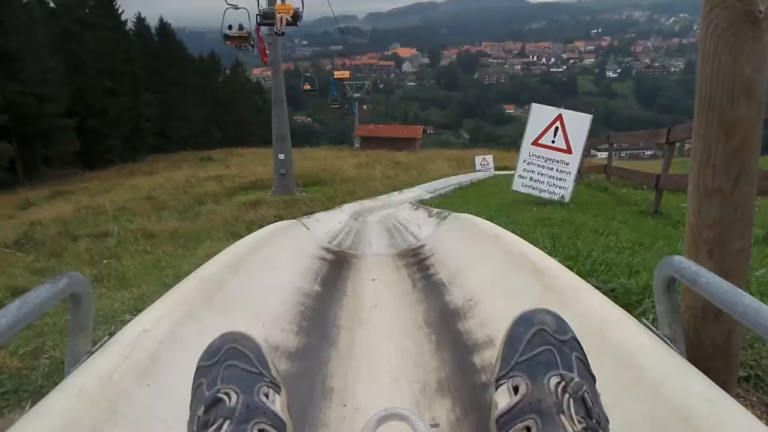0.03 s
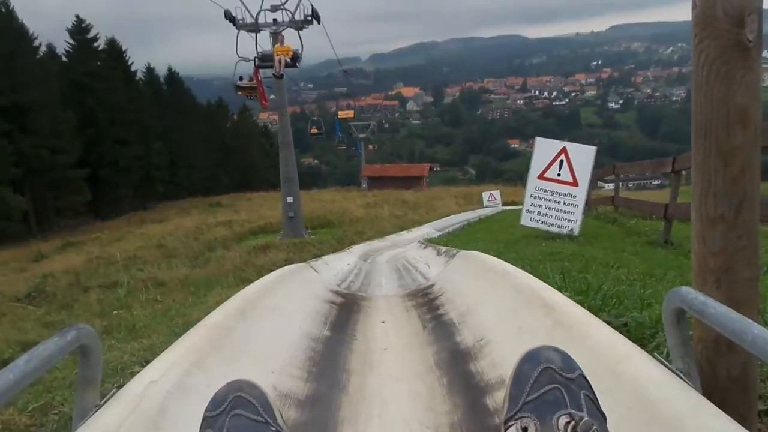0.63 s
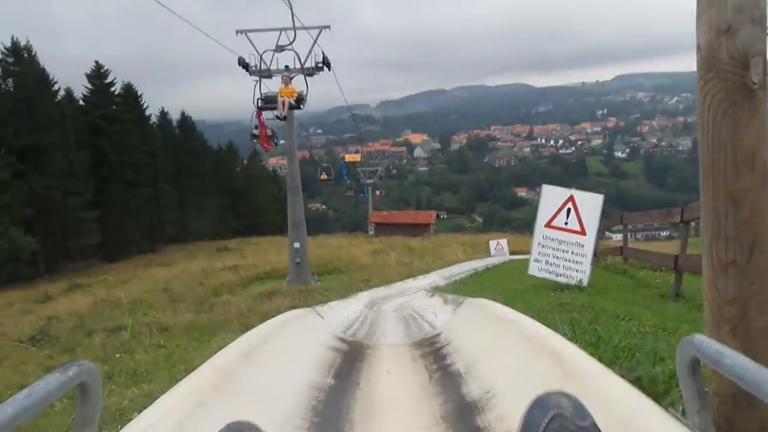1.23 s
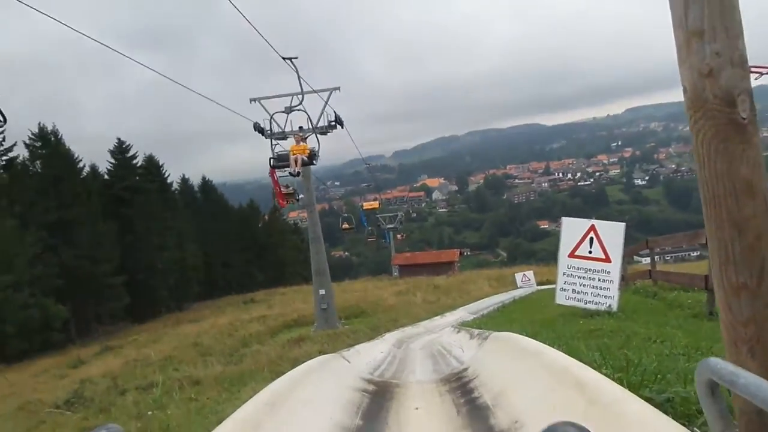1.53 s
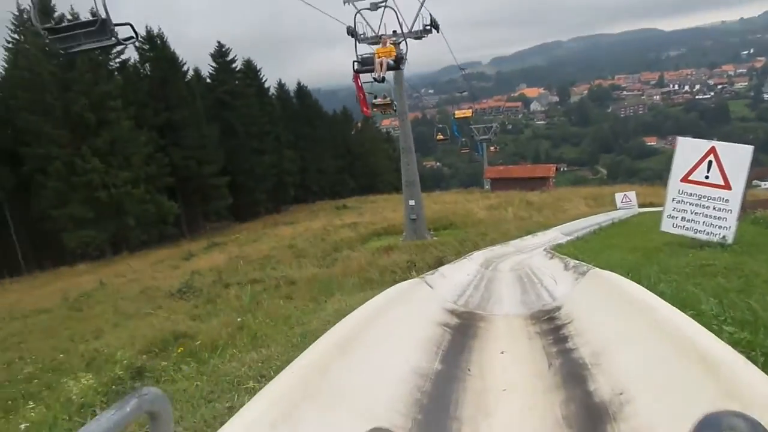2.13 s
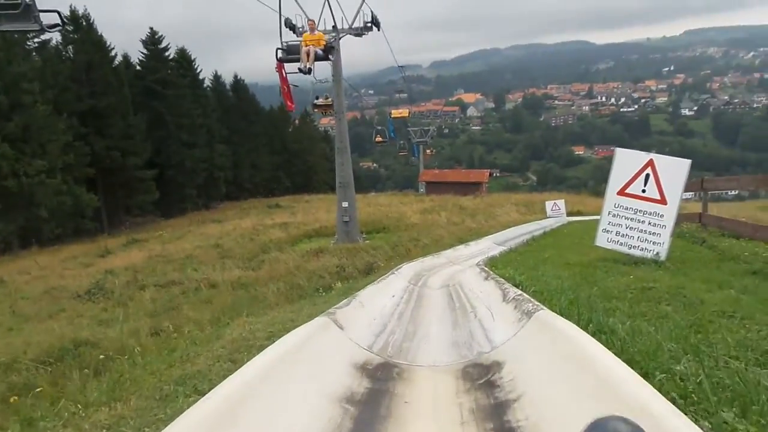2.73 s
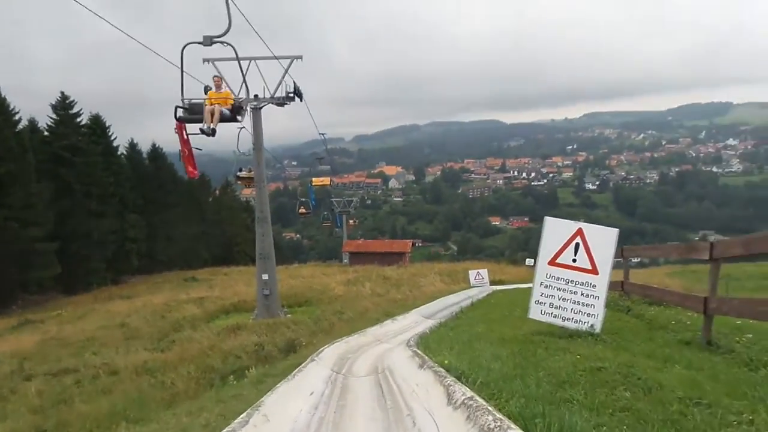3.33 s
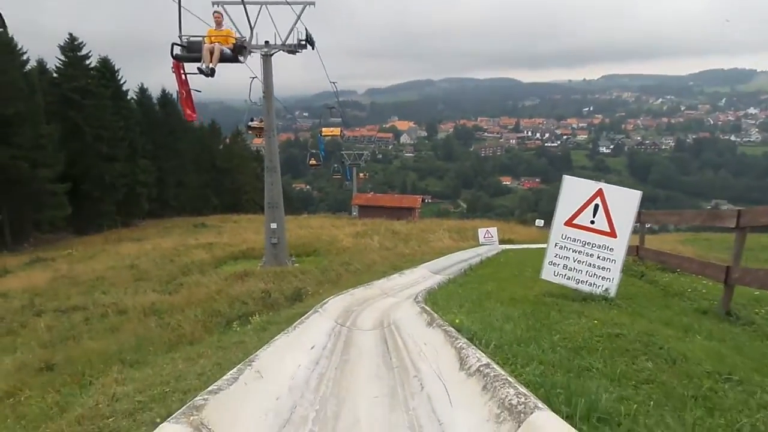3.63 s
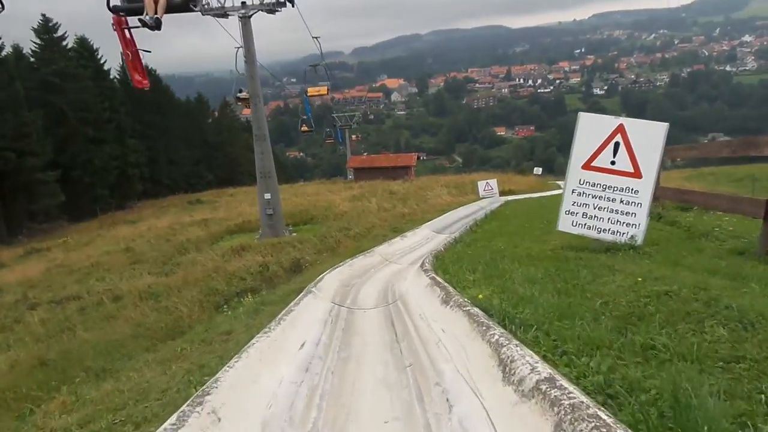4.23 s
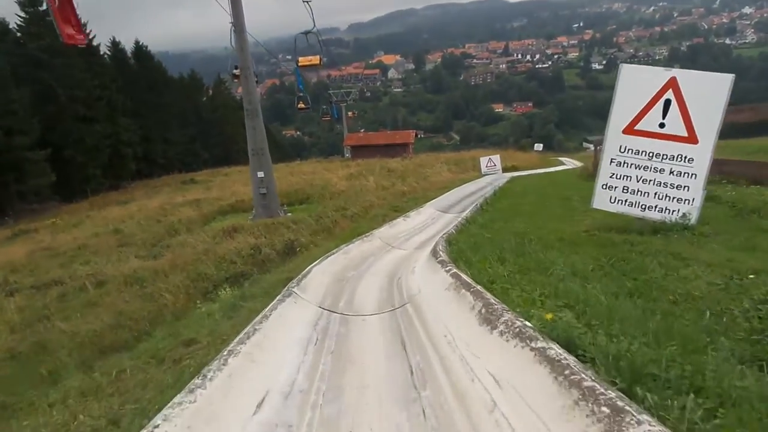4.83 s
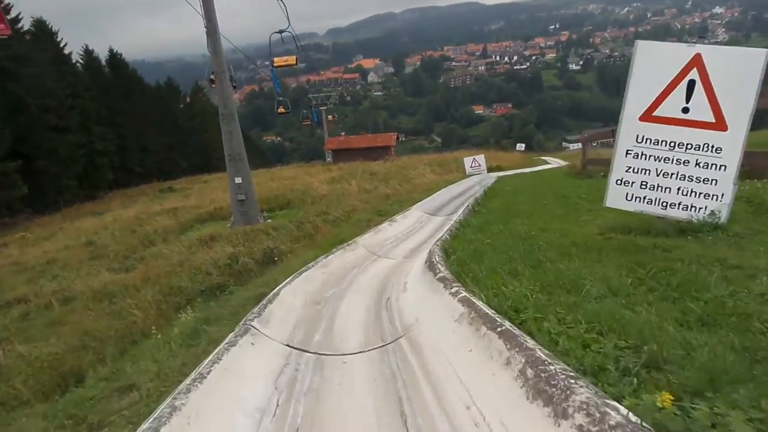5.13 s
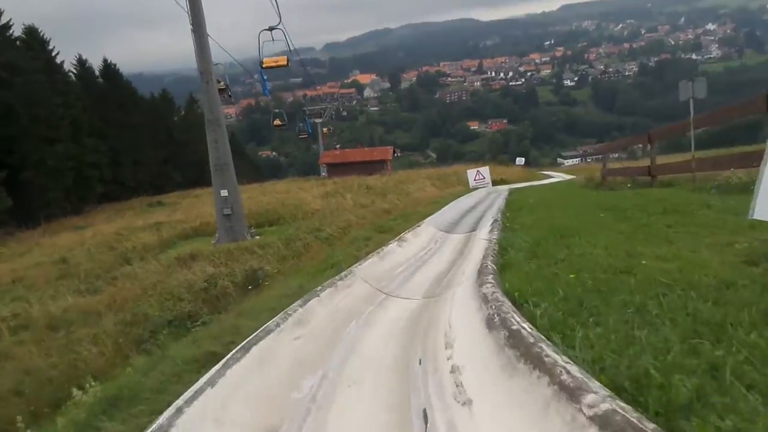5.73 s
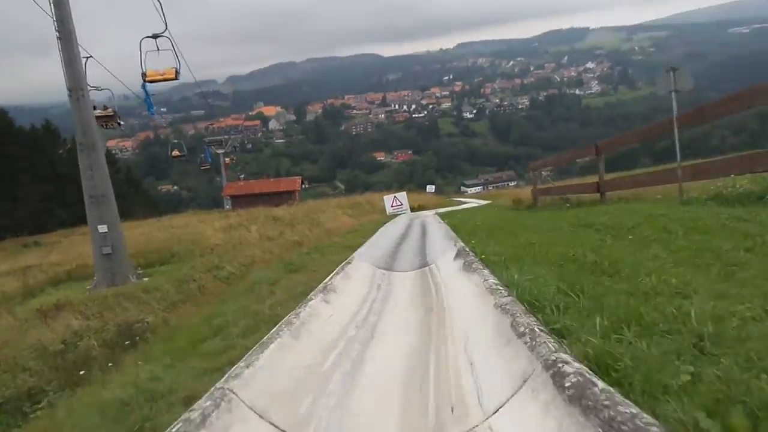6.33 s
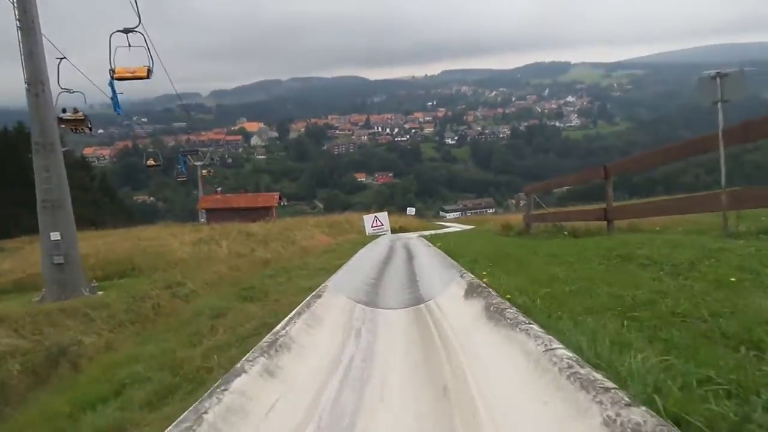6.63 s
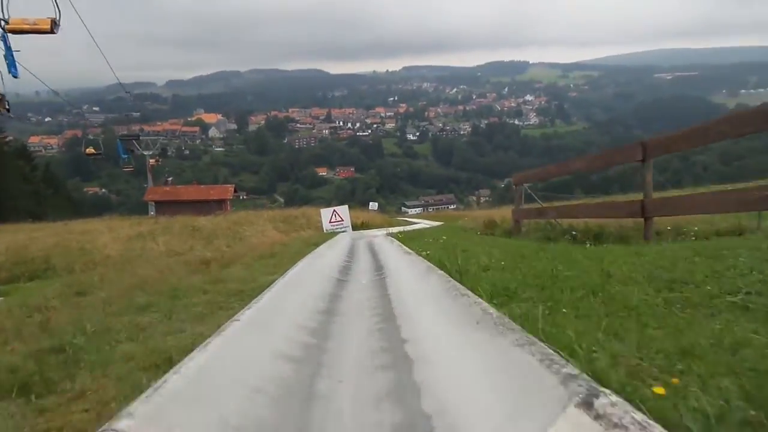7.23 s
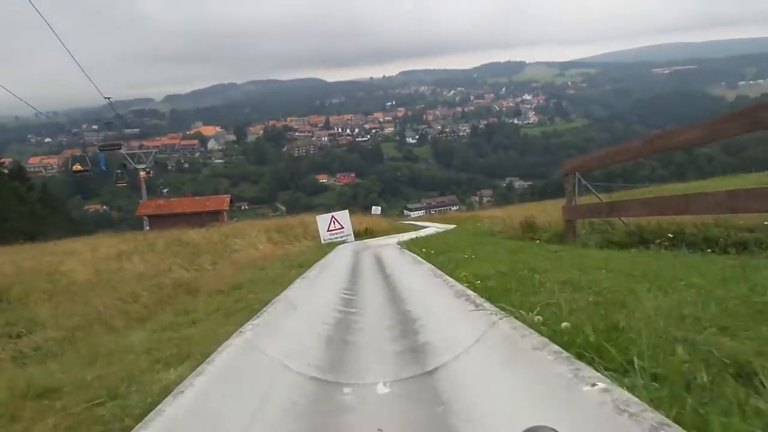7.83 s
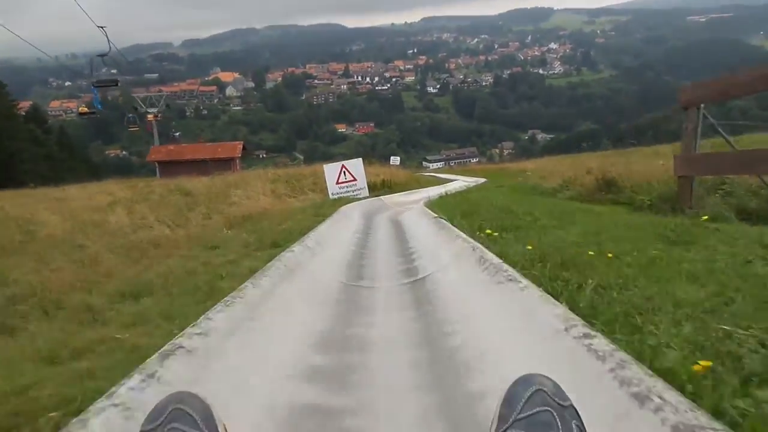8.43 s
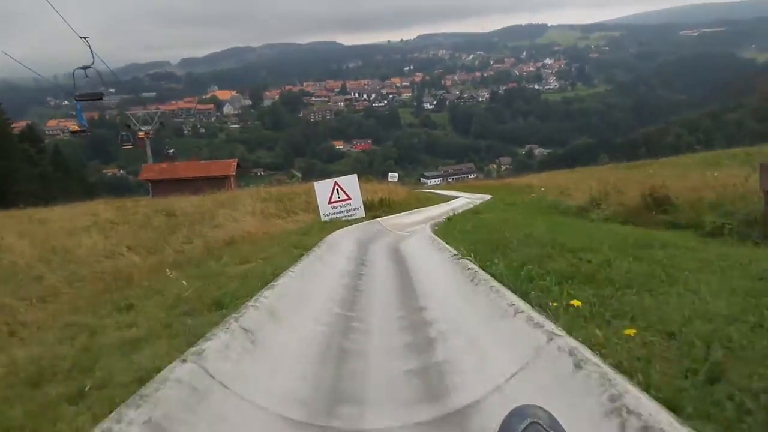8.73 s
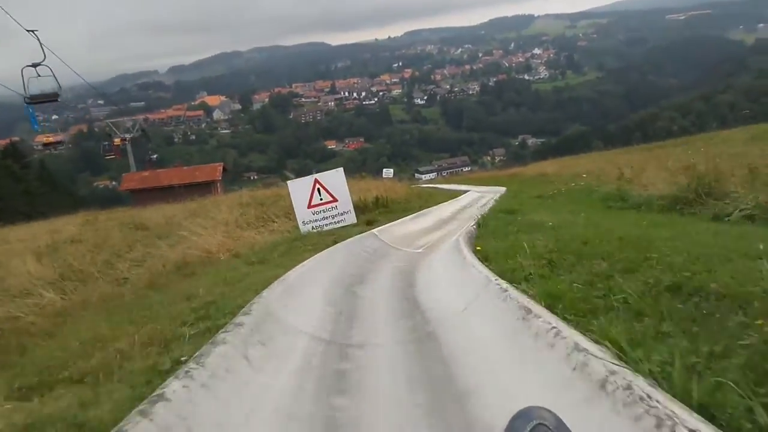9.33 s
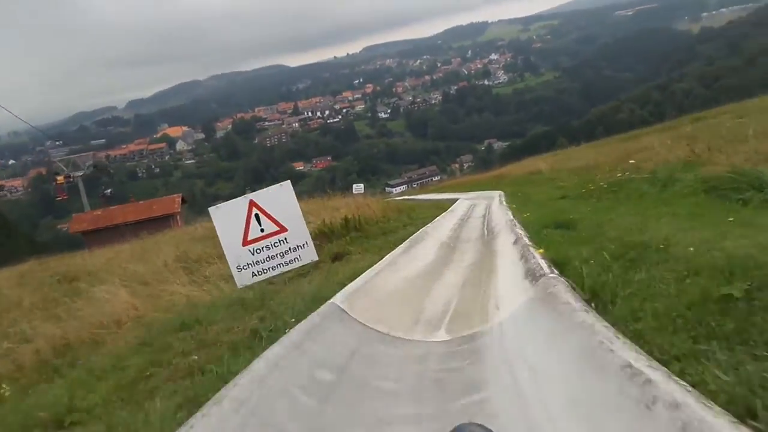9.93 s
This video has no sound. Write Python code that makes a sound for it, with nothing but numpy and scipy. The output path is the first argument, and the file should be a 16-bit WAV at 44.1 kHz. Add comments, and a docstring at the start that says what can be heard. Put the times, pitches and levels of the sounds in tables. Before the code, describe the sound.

After close handling noise, a sled sets off along a hillside trough with a growing hollow rumble, sliding hiss, sharp knocks and light wind.

```python
"""A wheeled sled sets off down a fibreglass chute on a hillside, heard from the rider's seat.
In faint air, fingers rub, tap and creak on the right microphone port. A metal part clinks,
then the wheels start to roll: the shell rumbles, the trough roars and rings, the runners hiss.
As the speed grows, panel joints knock, fittings tick, grit crackles under a runner
and a wheel's flat spot thumps and makes the ride throb."""
import sys
import numpy as np
from scipy import signal
from scipy.fft import rfft, irfft, next_fast_len
from scipy.io import wavfile
from scipy.ndimage import uniform_filter1d, minimum_filter1d

SR = 44100
rng = np.random.default_rng(int(sys.argv[2]) if len(sys.argv) > 2 else 0)


def digitize_waveform(pressure):
    """Quantize a signal to 16-bit integers and store it at the path in sys.argv[1].

    Rows of a 2-D input are taken as channels; values are limited to [-1, 1].
    """
    field = np.atleast_2d(pressure).T
    bounded = np.clip(field, -1, 1)
    quanta = np.round(bounded * 32767).astype(np.int16)
    wavfile.write(sys.argv[1], SR, quanta)


N = 439677
TIME = np.arange(N) / SR


def from_db(db):
    """Decibels to gain."""
    return 10 ** (np.asarray(db) / 20)


def unit_rms(x):
    """Scale to unit power."""
    return x / np.sqrt(np.mean(x ** 2) + 1e-20)


def automation(rows):
    """One curve over time for each column after the first, joined by straight lines."""
    times, *columns = np.transpose(rows)
    return [np.interp(TIME, times, column) for column in columns]


def gate(start_s, end_s=np.inf):
    """Open between two moments, with 10 ms fades."""
    return np.clip(np.minimum(TIME - start_s, end_s - TIME) * 100, 0, 1)


def swell(start_s, length_s, attack_s, release_s):
    """Fade in, hold until the length is up, then fall 60 dB per release time."""
    since = TIME - start_s
    return np.clip(since / attack_s, 0, 1) * from_db(-60 * np.maximum(since - length_s, 0) / release_s)


def at_hz(points, hz):
    """Read a table on a log-frequency axis."""
    points_hz, values = np.transpose(points)
    return np.interp(np.log(hz + 1e-3), np.log(points_hz), values)


def butter(order, hz, kind):
    """Butterworth filter sections."""
    return signal.butter(order, hz, kind, fs=SR, output="sos")


def drift(rate_hz):
    """Smooth random modulation at unit rms."""
    pole = np.exp(-80 * np.pi * rate_hz / SR)
    steps = rng.standard_normal(N // 40 + 2002)
    slow = signal.lfilter([1], [1, -2 * pole, pole * pole], steps)[2000:]
    return np.interp(np.arange(N) / 40, np.arange(len(slow)), unit_rms(slow))


def noise():
    """Two unrelated white noises."""
    return rng.standard_normal((2, N))


def grains(per_s, spread_db):
    """Tiny contacts of uneven size at random moments."""
    sizes = from_db(spread_db * np.minimum(rng.exponential(1, N), 4))
    return unit_rms(noise() * sizes * (rng.random(N) < per_s / SR) / np.sqrt(per_s))


def impulses(times_s, levels_db):
    """One impulse for each blow."""
    out = np.zeros(N)
    out[np.round(np.asarray(times_s) * SR).astype(int)] = from_db(levels_db)
    return out


def ring(blows, hz, t60_s):
    """A struck mode: each blow starts a dying sine."""
    pole, step = from_db(-60 / (t60_s * SR)), 2 * np.pi * hz / SR
    return signal.lfilter([0, np.sin(step)], [1, -2 * pole * np.cos(step), pole * pole], blows + 1e-18)


def decay(blows, t60_s):
    """An envelope that jumps at each blow and dies away."""
    return signal.lfilter([1], [1, -from_db(-60 / (t60_s * SR))], blows + 1e-18)


def resonance(hz, width_hz):
    """The EQ curve of a single resonance."""
    shape = [(-2, -24), (-0.5, -3), (0, 0), (0.5, -3), (2, -24)]
    return [(hz + widths * width_hz, gain_db) for widths, gain_db in shape]


def glide(pair, ratio):
    """Bend the pitch of a steady sound by a changing ratio."""
    place = np.cumsum(ratio) % N
    return np.array([np.interp(place, np.arange(N), port) for port in pair])


# How alike the two microphone ports sound, 1 or more being mono: freq_hz, likeness
PORT_LIKENESS = [(30, -5.5), (60, 0), (130, 2), (290, 1.04), (640, 0.71), (1400, 0.35), (3000, 0.11),
                 (15000, -0.13)]
# Panning across the spectrum: freq_hz, left_minus_right_db
PORT_BALANCE = [(60, -1.5), (380, 1), (1300, -0.5), (2400, -0.5), (4400, -6.5), (6000, 9), (8100, 5),
                (15000, 1)]
# Treble comes from the left runner and reaches the right port late: freq_hz, lag_ms
RIGHT_PORT_LAG = [(1200, 0.0045), (2200, 0.344)]


def at_ports(pair, eq):
    """EQ two unrelated signals into stereo at unit rms: narrow in the bass, wide in the treble."""
    size = next_fast_len(N)
    hz = np.fft.rfftfreq(size, 1 / SR) + 1
    beyond_eq = np.maximum(np.maximum(eq[0][0] / hz, hz / eq[-1][0]), 1)
    mid, side = rfft(pair, size) * from_db(at_hz(eq, hz)) / beyond_eq ** 4
    alike = np.clip(at_hz(PORT_LIKENESS, hz), -1, 1)
    signs = np.array([[1], [-1]])
    stereo = np.sqrt(1 + alike) * mid + np.sqrt(1 - alike) * side * signs
    stereo[1] *= np.exp(-2j * np.pi * hz * at_hz(RIGHT_PORT_LAG, hz) / 1000)
    stereo *= from_db(signs * at_hz(PORT_BALANCE, hz) / 2)
    return unit_rms(irfft(stereo, size)[:, :N])


# Tone of the open air: freq_hz, gain_db
AIR_EQ = [(24, -36), (40, 7.5), (298, -7), (338, 3), (392, -14), (466, -9), (1650, -15.5), (4450, -16),
          (8270, -26.5), (15000, -20)]


def hillside_air():
    """A faint, steady bed of outdoor air."""
    return from_db(-63) * at_ports(noise(), AIR_EQ) * gate(0.58)


# A finger slides by the port: start_s, length_s, rub_db, hiss_db
FINGER_STROKES = [(0.482, 0.11, -75, -49.5), (0.584, 0.048, -82, -53.5), (0.628, 0.064, -55.5, -51.5),
                  (0.723, 0.022, -66, -44.5), (0.744, 0.12, -42.5, -41), (0.925, 0.15, -51, -59.5),
                  (1.018, 0.063, -42.5, -43.5), (1.086, 0.056, -37, -41.5), (1.122, 0.2, -57.5, -58.5)]
STROKE_FADES_S = 0.028, 0.026   # attack, release


def finger_pressure():
    """Envelopes of low rub and hiss: the hand rests on the housing, with strokes on top."""
    resting = gate(0.44, 1.5)
    rub, hiss = from_db(-70) * resting, from_db(-74.5) * resting
    for start_s, length_s, rub_db, hiss_db in FINGER_STROKES:
        stroke = swell(start_s, length_s, *STROKE_FADES_S)
        rub += from_db(rub_db) * stroke
        hiss += from_db(hiss_db) * stroke
    return rub, hiss


# The dull and the bright side of skin friction: freq_hz, gain_db
RUB_LOW_EQ = [(25, -17), (80, -9), (170, -2.5), (255, 4), (340, -5), (550, -12), (1000, -18.5),
              (2000, -19.5)]
RUB_HIGH_EQ = [(600, -10), (1000, 0), (1700, -4), (2800, -5), (3700, 5.5), (4800, 5), (6100, 8), (8000, -7),
               (9500, -10), (12000, -7), (16000, -16)]
# The hollow between finger and port resonates as it opens and closes: time_s, pitch_hz
HOLLOW_PITCH = [(0.48, 1171), (0.6, 954), (0.82, 930), (0.92, 565), (0.98, 746), (1.04, 994), (1.12, 1248),
                (1.3, 1000)]


def finger_drag():
    """Skin drags over the housing in tiny catches and sounds the hollow under the finger."""
    rub, hiss = finger_pressure()
    drag = at_ports(grains(1500, spread_db=1.5), RUB_LOW_EQ)[1] * rub * from_db(8.5)
    drag += at_ports(grains(12000, spread_db=2.5), RUB_HIGH_EQ)[1] * hiss * from_db(7.5)
    pitch_hz, = automation(HOLLOW_PITCH)
    hollow = at_ports(grains(4000, spread_db=-2), resonance(pitch_hz.mean(), width_hz=170))
    hollow = glide(hollow, pitch_hz / pitch_hz.mean())[1]
    return drag + hollow * np.hypot(0.81 * hiss, 0.61 * rub) * from_db(-9)


def finger_creak(start_s=0.935, length_s=0.045):
    """A fingertip sticks and slips unevenly on the housing, faster and faster."""
    slip_hz = np.interp(TIME, [start_s, start_s + length_s], [440, 780]) * (1 + 0.05 * drift(120))
    phase = 2 * np.pi * np.cumsum(slip_hz) / SR
    slips = np.sin(phase) + from_db(-16) * np.sin(2 * phase)
    return slips * swell(start_s, length_s, *STROKE_FADES_S) * from_db(-46 + 2 * drift(60))


# Fingers land on the housing: start_s, thump_db, knock_db, click_db
FINGER_TAPS = [(.447,-40,-44,-38.5), (.488,-34,-51,-61), (0.652,-34,-39.5,-42.5), (0.776,-16.5,-22,-34),
               (0.8,-36,-31.5,-29), (.866,-26,-52,-47), (1.036,-21,-54,-52), (1.115,-36,-30,-35),
               (1.205,-33,-36,-41.5), (1.254,-18.5,-50,-15), (1.307,-29,-58,-38.5), (1.335,-61,-39,-29.5)]
# The housing's short ring: pitch_hz, level_db, t60_s
HOUSING_MODES = [(835, -2.5, 0.015), (1750, -5.5, 0.0092), (2900, 0.5, 0.0046), (3770, 1.5, 0.0088),
                 (4280, 0, 0.0089), (4860, 0, 0.0085), (6360, -12.5, 0.0076), (11400, -28, 0.0027)]


def finger_taps():
    """Each tap is a soft thump, a knock of the housing's modes and a bright click."""
    start_s, thump_db, knock_db, click_db = np.transpose(FINGER_TAPS)
    taps = ring(impulses(start_s, thump_db + 11), hz=260, t60_s=0.012)
    for k, (hz, mode_db, t60_s) in enumerate(HOUSING_MODES):
        nail = at_hz([(1900, 0.032), (3900, 1.0)], hz)   # fingernails reach the high modes
        level_db = (1 - nail) * knock_db + nail * click_db + mode_db + 10.5
        taps += (-1) ** k * ring(impulses(start_s, level_db), hz, t60_s)
    taps += at_ports(noise(), RUB_HIGH_EQ)[1] * decay(impulses(start_s, click_db + 6.5), t60_s=0.014)
    return signal.sosfilt(butter(1, 120, "high"), taps)


def fingers():
    """The hand is right beside the right port, so little of it reaches the left."""
    drag, taps = finger_drag(), finger_taps()
    return (drag + finger_creak()) * from_db([[-29], [0]]) + taps * from_db([[-19], [0]])


# Ring of a small metal part: pitch_hz, level_db, t60_s
METAL_MODES = [(680, -7, 0.15), (925, -9, .12), (1437, -15, .2), (2065, -15, 0.2), (4872, -1, .06),
               (6100, 1, .04), (6700, 4, 0.037), (7063, -3, 0.1), (7171, -4, 0.1)]
# Midrange clatter after a blow: freq_hz, gain_db
RAP_EQ = [(900, 5.5), (1300, 3.5), (2000, 2), (2800, -4), (4000, -42)]


def clink():
    """A metal part is touched as the sled starts to move, and rattles out faintly."""
    blow = impulses(times_s=[1.715], levels_db=[-43])
    modes = sum(from_db(mode_db) * ring(blow, hz, t60_s) for hz, mode_db, t60_s in METAL_MODES)
    tick = from_db(-2) * at_ports(noise(), RUB_HIGH_EQ) * decay(blow, t60_s=0.1)
    tail = from_db(-5.5) * at_ports(noise(), RAP_EQ) * decay(blow, t60_s=0.25)
    return modes + tick + tail


# The sled's loose fittings tick: start_s, level_db
FITTING_TICKS = [(1.52, -55), (1.819, -53), (2.875, -20.5), (3.256, -23.5), (3.432, -26), (3.671, -22),
                 (4.474, -19), (8.521, -23), (9.874, -20.5)]
# Bright edge of a hard contact: freq_hz, gain_db
CRACK_EQ = [(2600, 12), (3100, 16), (3550, 10), (4400, 16), (4950, 16), (5550, 7), (6700, -0.5), (7800, -6),
            (10000, -9), (15500, -14)]


def loose_fittings():
    """Each fitting ticks and rebounds once, softly."""
    start_s, level_db = np.transpose(FITTING_TICKS)
    rebound_s = start_s + 0.0074 * rng.uniform(0.37, 2.5, len(start_s))
    blows = impulses(start_s, level_db) + impulses(rebound_s, level_db - 26)
    return at_ports(noise(), CRACK_EQ) * decay(blows, t60_s=0.045)


# A runner grinds over grit: start_s, end_s, level_db
GRIT_PATCHES = [(2.84, 2.922, -46), (4.823, 4.933, -32), (5.291, 5.878, -36), (6.807, 6.85, -28.5),
                (6.863, 6.91, -37), (8.378, 8.457, -29.5)]
# Tone of the crackle: freq_hz, gain_db
GRIT_EQ = [(2500, 11.5), (4300, 6), (5500, 8), (7000, -3), (10000, -10), (15500, -12)]


def grit_scrapes():
    """Grit under a runner crackles brightly."""
    pressure = sum(from_db(level_db) * gate(start_s, end_s) for start_s, end_s, level_db in GRIT_PATCHES)
    return at_ports(grains(3000, spread_db=5), GRIT_EQ) * pressure * from_db(1.3 * drift(40))


# Base faders for the wheels and runners: time_s, rumble_db, hiss_db
RIDE_FADERS = [(1.66, -69, -79), (1.9, -51.5, -64.5), (2.15, -49.5, -56), (2.3, -42.5, -49.5),
               (2.58, -25.5, -37.5), (2.87, -23, -34.5), (3.1, -30, -36.5), (3.25, -29.5, -38),
               (3.68, -31, -35.5), (4.0, -30, -34.5), (4.25, -27.5, -35.5), (4.68, -23.5, -31),
               (4.85, -22.5, -31), (5.1, -28, -32), (5.86, -26, -30), (5.9, -26.5, -33),
               (5.98, -24.5, -32.5), (6.015, -33, -43.5), (6.15, -29, -40), (6.58, -37.5, -40.5),
               (7.1, -30, -38), (7.42, -30.5, -32), (7.63, -27.5, -35), (7.8, -30, -30.5),
               (8.0, -30.5, -29.5), (8.5, -27, -32), (8.8, -30, -30), (9.1, -28.5, -31), (9.22, -29.5, -34),
               (9.36, -28, -28.5), (9.97, -25.5, -28)]
# Rough stretches of trough: start_s, length_s, rumble_change_db, roar_lift_db
ROUGH_STRETCHES = [(2.607, 0.16, -4, 2.5), (3.276, 0.21, 1.5, 6), (3.623, 0.67, 3, 5),
                   (4.34, 0.69, -0.5, 5), (4.543, 0.045, -2.5, 3), (6.64, 0.27, 4.5, 5), (9.0, 0.17, 2, 2),
                   (9.517, 0.25, 0, 3.5)]
ROLL_START_S = RIDE_FADERS[0][0]


def ride_levels():
    """Rumble, roar and hiss in dB; rough stretches lift the roar and raise or lower the rumble."""
    rumble_db, hiss_db = automation(RIDE_FADERS)
    roar_db = rumble_db + 0.11 * (hiss_db - rumble_db)   # the roar mostly follows the rumble
    for start_s, length_s, rumble_change_db, roar_lift_db in ROUGH_STRETCHES:
        stretch = swell(start_s, length_s, attack_s=0.015, release_s=0.36)
        rumble_db += rumble_change_db * stretch
        roar_db += roar_lift_db * stretch
    return rumble_db, roar_db, hiss_db


# Low bluster of rushing air: freq_hz, gain_db
BUFFET_EQ = [(25, -27), (60, -7), (110, -16), (200, 2), (400, -12)]


def wind_buffet(level_db):
    """Air buffets each port on its own."""
    return np.array([at_ports(noise(), BUFFET_EQ)[port] * from_db(level_db + 1.5 * drift(3.3))
                     for port in (0, 1)])


# Two narrow peaks of wheel whine: freq_hz, gain_db
WHINE_EQ = [(900, -15), (1020, 11), (1150, -16), (1720, -29), (1870, 6), (2020, -26)]


def wheel_whine():
    """The wheels whine briefly as they spin up."""
    envelope = swell(start_s=2.5, length_s=0.3, attack_s=0.034, release_s=0.3004)
    return at_ports(noise(), WHINE_EQ) * from_db(-37) * envelope


# The shell's hum and boom and the panels' three rings: pitch_hz, width_hz, level_over_rumble_db
SINGING_MODES = [(160, 21, -13), (238, 69, -14), (602.5, 55, -13), (885, 58, -19.5), (1688, 240, -27.5)]
# The nearest mode sings out, its pitch shifted by the load: start_s, length_s, pitch_hz, level_db
SINGING_SPURTS = [(2.479, 0.25, 926, -32), (2.582, 0.18, 245.2, -23), (3.294, 0.19, 238, -20),
                  (4.418, 0.2, 509, -26), (4.699, 0.076, 658, -24.5), (5.199, 0.35, 123.3, -29.5),
                  (7.182, 0.62, 160, -31.5), (7.705, 0.13, 898, -27.5), (7.89, 0.12, 880, -25),
                  (7.928, 0.36, 158.6, -27), (8.129, 0.17, 903, -30), (7.751, 0.53, 1663, -37),
                  (8.498, 0.93, 590.4, -29), (9.523, 0.45, 614, -26), (9.548, 0.19, 924, -28.5),
                  (9.773, 0.16, 962, -26), (9.498, 0.39, 1663, -33.5)]


def mode_drive(mode_hz, steady_db):
    """Gain and pitch of a mode: it follows the rumble, and spurts lift it and pull its pitch."""
    power = from_db(automation(RIDE_FADERS)[0] + steady_db) ** 2
    weighted_hz = power * mode_hz
    for start_s, length_s, hz, level_db in SINGING_SPURTS:
        nearest_hz = min(SINGING_MODES, key=lambda mode: abs(mode[0] - hz))[0]
        if nearest_hz == mode_hz:
            spurt = from_db(level_db) * swell(start_s, length_s, attack_s=0.034, release_s=0.3004)
            power += spurt ** 2
            weighted_hz += spurt ** 2 * hz
    return np.sqrt(power), weighted_hz / power


def singing_panels():
    """The wheels keep the shell humming and the panel beneath them ringing, wavering and flickering."""
    out = 0
    for hz, width_hz, steady_db in SINGING_MODES:
        tone = at_ports(noise(), resonance(hz, width_hz))
        tone += from_db(-13) * at_ports(noise(), resonance(2 * hz, 2 * width_hz))
        gain, pitch_hz = mode_drive(hz, steady_db)
        wavering = glide(tone, pitch_hz / hz + 0.014 * drift(4.02))
        out += wavering * gain * from_db(3.5 * drift(25))
    return out * gate(ROLL_START_S)


# Tone of the sliding runners: freq_hz, gain_db
HISS_EQ = [(700, 6), (1280, 4), (1480, 1.5), (1800, 5), (2150, 0.5), (2900, 0), (3450, -1.5), (4350, 1.5),
           (5300, -3.5), (6300, -11.5), (8000, -20), (11000, -23), (15500, -32)]
# High shelf on the hiss: time_s, gain_db
HISS_SHEEN = [(5.9, 4), (7.3, 2.5), (7.8, -0.5), (9.97, 0.5)]


def runner_hiss(level_db):
    """Runners slide over the trough; the top of their hiss dulls late in the ride."""
    hiss = at_ports(noise() + 0.36 * grains(4000, spread_db=-0.5), HISS_EQ) * from_db(level_db)
    top = signal.sosfiltfilt(butter(2, 5400, "high"), hiss)
    return hiss + top * (from_db(automation(HISS_SHEEN)[0]) - 1)


# Low boom of the sled's shell: pitch_hz, level_db, t60_s
SHELL_MODES = [(107, -16, 0.046), (159, 3, 0.047), (222.3, 3.5, 0.08), (268.4, -2.5, 0.13),
               (329.4, 1, 0.058), (380, 4.5, 0.016)]


def flat_spot_bumps(turns, level_db):
    """At each whole turn the wheel's flat spot thumps the shell, never twice alike."""
    contact = np.diff(np.floor(turns), prepend=0) > 0
    blows = contact * from_db(level_db + 1.2 * drift(20))
    thumps = sum((-1) ** k * from_db(mode_db + 1.2 * drift(21)) * ring(blows, hz, 0.65 * t60_s)
                 for k, (hz, mode_db, t60_s) in enumerate(SHELL_MODES))
    return signal.sosfilt(butter(2, [130, 420], "band"), thumps)


# Spin of the out-of-round wheel: time_s, turns_per_s
WHEEL_SPEED = [(1.7, 2), (2.8, 8), (5.0, 12), (6.2, 13.3), (6.8, 13.5), (7.05, 14), (8.3, 14), (8.6, 14.4),
               (9.97, 14.4)]
# How hard its flat spot hits, scaled for each layer: time_s, depth_db
THROB_DEPTH = [(2.8, 1.5), (5.0, -1.5), (6.2, 3.5), (6.9, 1), (7.35, 5), (7.7, 7), (8.2, 7), (9.2, 4.5),
               (9.97, -3)]
# Tone of the shell's rumble and of the trough's roar: freq_hz, gain_db
RUMBLE_EQ = [(25, -36), (45, -32), (70, -16.5), (100, -6.5), (140, -4), (185, 1), (235, 4), (290, -0.5),
             (350, 1), (410, -12), (480, -9.5)]
ROAR_EQ = [(300, 0), (420, 0.5), (540, 2.5), (700, 3), (850, -2.5), (1050, -11.5), (1400, -16), (2000, -31),
           (3000, -35)]


def rolling():
    """Wheels on the rough trough shake the shell, throbbing once a turn; runners hiss, air rushes by."""
    rumble_db, roar_db, hiss_db = ride_levels()
    turns_per_s, = automation(WHEEL_SPEED)
    depth_db, = automation(THROB_DEPTH)
    turns = np.cumsum(turns_per_s) / SR
    turns -= np.interp(7.323, TIME, turns)   # the flat spot lands at this second
    throb = depth_db * np.cos(2 * np.pi * turns - 0.8)   # the shaking lags just behind each bump
    load = drift(17)   # the sled's weight jiggles on its wheels
    bumps = flat_spot_bumps(turns, rumble_db + 2 * depth_db - 3.5)
    rumble = at_ports(grains(60 * turns_per_s, spread_db=1.8), RUMBLE_EQ)
    rumble *= from_db(rumble_db + 3 - 0.3 * depth_db + 0.7 * throb + 1.2 * load)
    roar = at_ports(grains(120 * turns_per_s, spread_db=1.16), ROAR_EQ)
    roar *= from_db(roar_db - 1.5 + 0.057 * throb + 1.02 * load)
    hiss = runner_hiss(hiss_db + 6 + 1.11 * load)
    wind = wind_buffet(rumble_db - 13.5)
    return (rumble + bumps + roar + hiss + wind + wheel_whine()) * gate(ROLL_START_S)


# The sled jolts and knocks, at panel joints and on the wheel's hardest thumps:
# start_s, thump_db, clack_db, clack_hz, brightness_db
JOLTS = [(1.845, -62, -53, 690, -10), (1.934, -33.5, -40, 916, -14), (2.643, -21, -42, 514, -22),
         (2.749, -19, -31, 535, -22), (2.783, -18, -32, 496, -21), (2.829, -38, -29, 690, -1.5),
         (2.872, -23, -33, 550, 0.5), (3.344, -31, -31, 560, -20), (3.417, -25, -30, 620, -10),
         (3.644, -27, -25.5, 710, -3), (4.715, -21.5, -28, 595, -18), (4.796, -8, -26, 460, -24),
         (4.829, -10, -28, 640, 0.5), (4.851, -10, -39.5, 602, 3.5), (4.898, -26, -34, 505, -0.5),
         (4.984, -17, -9.5, 655, -36), (5.44, -30, -22.5, 756, -18), (5.56, -39.5, -20.5, 830, -25),
         (5.637, -23, -35, 595, -20), (5.739, -24, -33, 600, -18), (5.876, -8, -7, 890, -21),
         (6.02, -11, -18, 647, 0), (6.044, -20.5, -26, 620, -3), (6.116, -23, -19.5, 527, -4.5),
         (6.123, -18.5, -24, 477, -13.5), (6.226, -44, -29.5, 524, -6), (6.304, -39, -36, 452, -9),
         (6.687, -23.5, -29.5, 472, -8.5), (6.813, -30, -29.5, 690, 0), (6.871, -27, -33.5, 460, -2),
         (6.901, -34, -16.5, 495, -3), (6.926, -34, -23, 486, -3), (7.323, -24, -40, 595, -15),
         (7.395, -23.5, -40, 600, -15.5), (7.461, -15, -24.5, 800, -1), (7.48, -32, -23, 890, -9),
         (7.577, -11, -26, 590, -18), (7.587, -13.5, -29, 588, -20), (7.652, -34, -19, 829, -10.5),
         (8.354, -23, -40, 550, -15), (8.385, -17.5, -33, 508, 0.5), (8.405, -19, -24.5, 477, -17),
         (8.48, -17, -18.5, 610, -17), (8.724, -22.5, -19.5, 936, -10), (8.95, -32, -26.5, 850, -22),
         (9.032, -18, -30, 608, -1), (9.085, -25, -39, 597, -15), (9.866, -14.5, -38, 635, -6),
         (9.882, -20.5, -34, 637, -12)]
# Clack of a struck panel: pitch_ratio, level_db, t60_s
PANEL_MODES = [(0.74, -2, 0.07), (1, 9.5, 0.046), (1.42, -5, 0.044), (1.95, -2.5, 0.033)]


def jolt_knocks():
    """A jolt thumps the shell and clacks the panel; hard ones rap and crack as well."""
    start_s, thump_db, clack_db, clack_hz, brightness_db = np.transpose(JOLTS)
    knocks = np.zeros(N)
    for k, (hz, mode_db, t60_s) in enumerate(SHELL_MODES):
        level_db = thump_db + 4.5 + mode_db + rng.normal(0, 1, len(start_s))
        knocks += (-1) ** k * ring(impulses(start_s, level_db), hz, t60_s)
    for hit_s, level_db, hz in zip(start_s, clack_db, clack_hz):
        onset = round(hit_s * SR)
        span = slice(onset, onset + SR // 8)
        blow = impulses([hit_s], [level_db])[span]
        for k, (ratio, mode_db, t60_s) in enumerate(PANEL_MODES):
            gain = from_db(mode_db + rng.normal(0, 1))
            knocks[span] += (-1) ** k * gain * ring(blow, hz * ratio, t60_s)
    knocks = signal.sosfilt(butter(2, [85, 1800], "band"), knocks)   # rubber wheels soften the contact
    rap_db, crack_db = clack_db + brightness_db, clack_db + 4.35 * brightness_db
    for eq, level_db in ((ROAR_EQ, clack_db - 3), (RAP_EQ, rap_db), (CRACK_EQ, crack_db)):
        snap = decay(impulses(start_s, level_db + 9), t60_s=0.0075)   # first contact
        clatter = decay(impulses(start_s, level_db + 5), t60_s=0.077)   # loose parts after it
        envelope = uniform_filter1d(uniform_filter1d(snap + clatter, size=30), size=30)
        knocks = knocks + at_ports(noise(), eq) * envelope
    return knocks


def scene():
    """Sled, hand and the faint air of the hillside."""
    air = hillside_air()
    sled = rolling() + singing_panels() + grit_scrapes() + loose_fittings() + jolt_knocks()
    return sled + fingers() + clink() + air


def record(dry):
    """A low cut, a fast limiter that ducks everything under the hardest jolts, then a high cut."""
    sound = signal.sosfilt(butter(2, 32, "high"), dry)
    over_db = np.maximum(20 * np.log10(np.abs(sound).max(axis=0) / 0.99 + 1e-9), 0)
    release_db = 180 * TIME   # recovers at 180 dB a second
    held_db = np.maximum.accumulate(over_db + release_db) - release_db
    gain_db = uniform_filter1d(minimum_filter1d(-held_db, size=65), size=65)
    high_cut = signal.ellip(10, 0.1, 80, 16000, fs=SR, output="sos")
    return signal.sosfilt(high_cut, sound * from_db(gain_db))


dry = scene()
out = record(dry)
digitize_waveform(out)
```